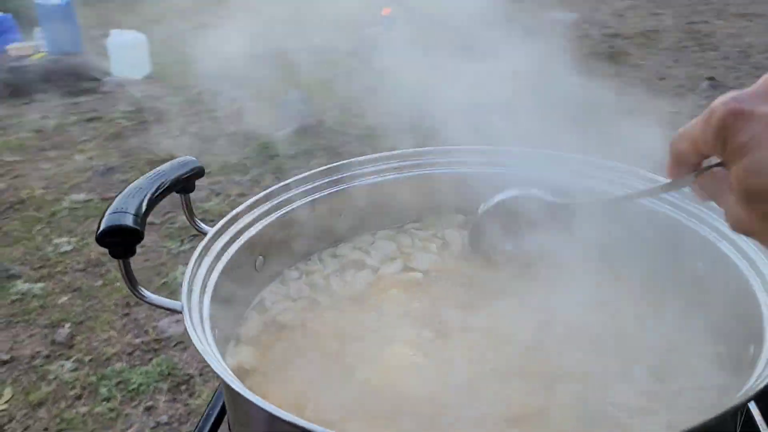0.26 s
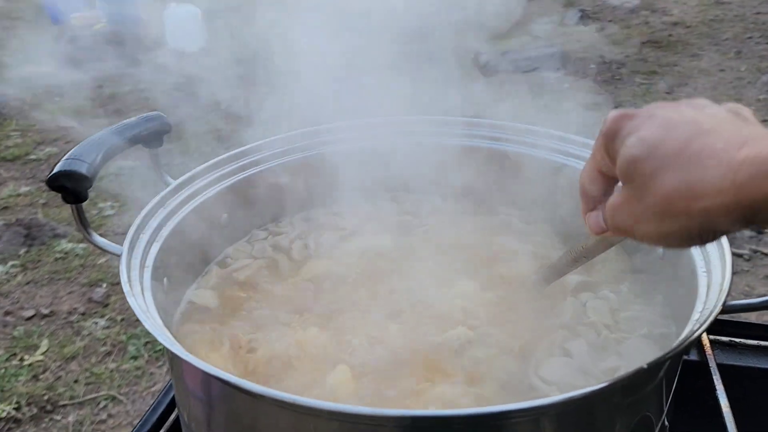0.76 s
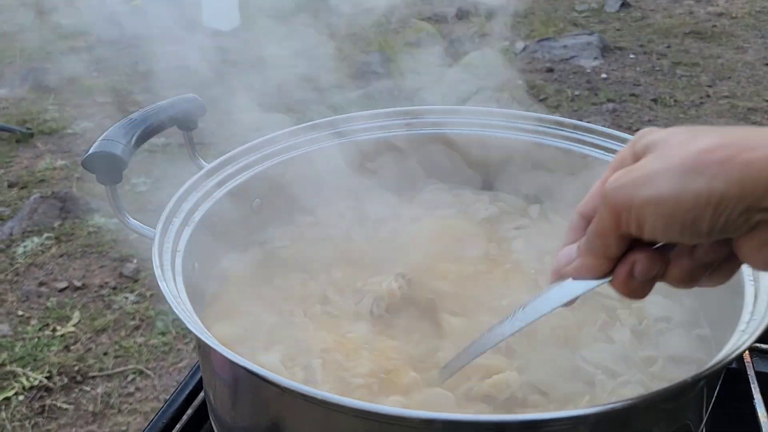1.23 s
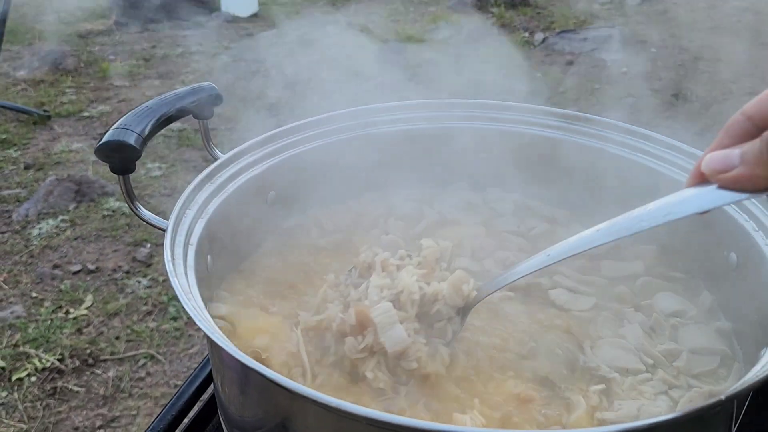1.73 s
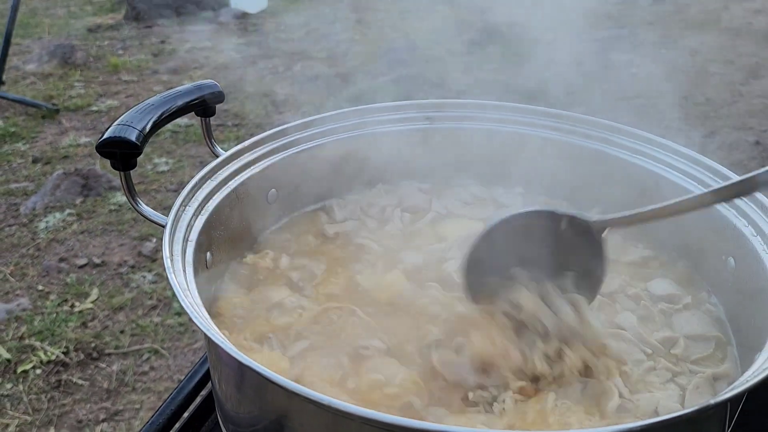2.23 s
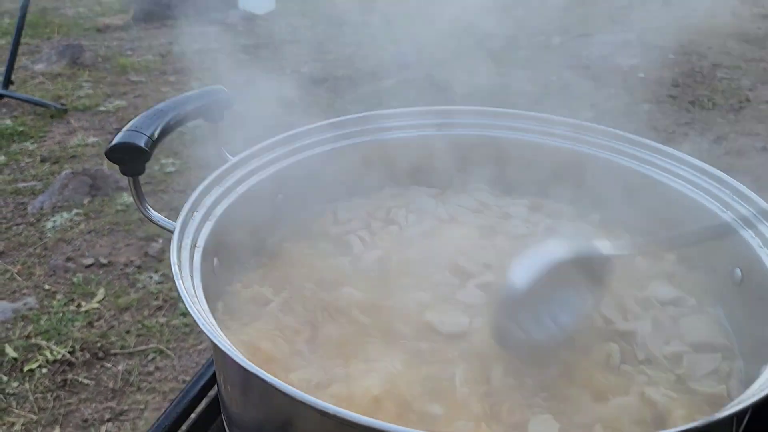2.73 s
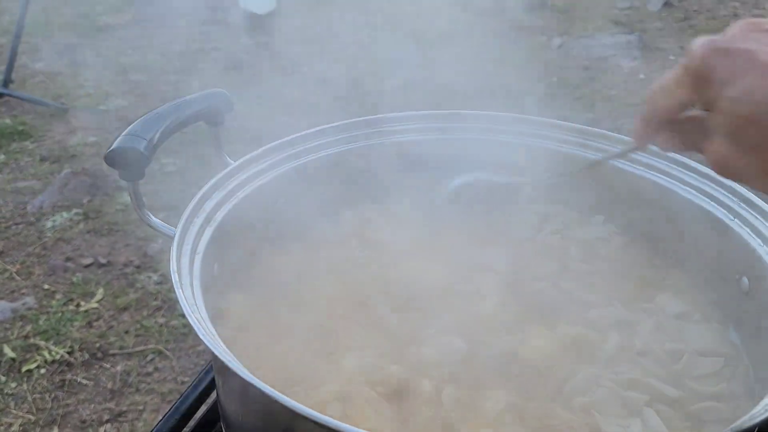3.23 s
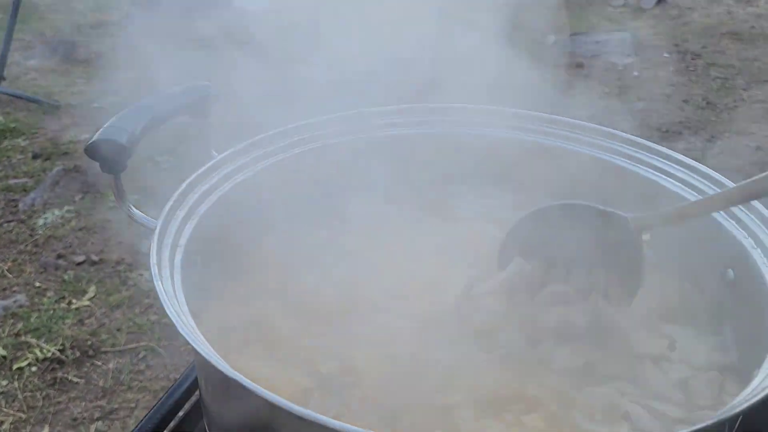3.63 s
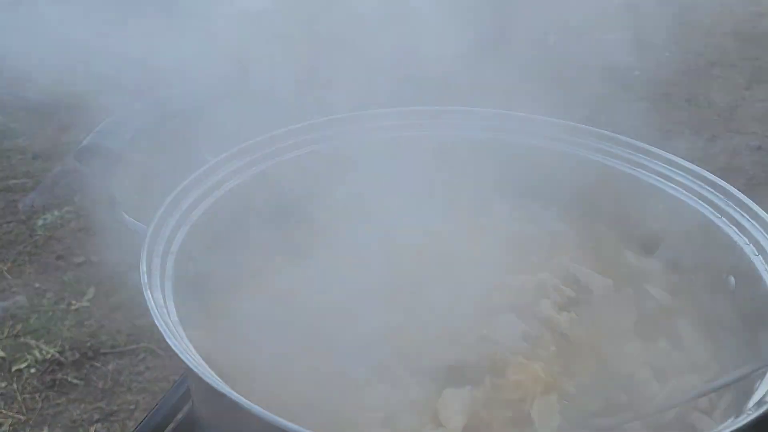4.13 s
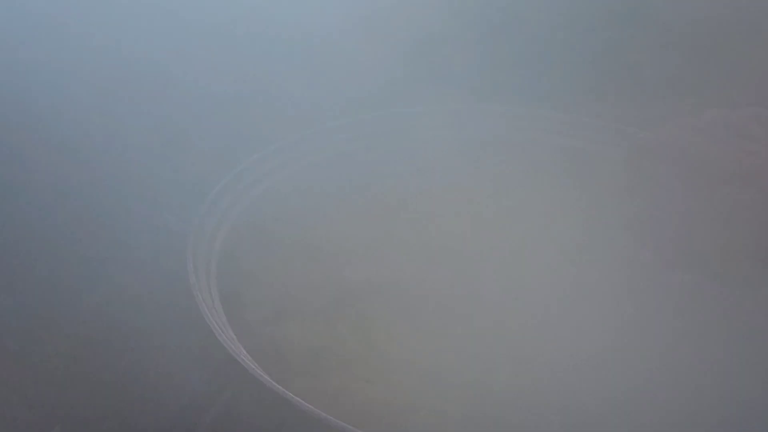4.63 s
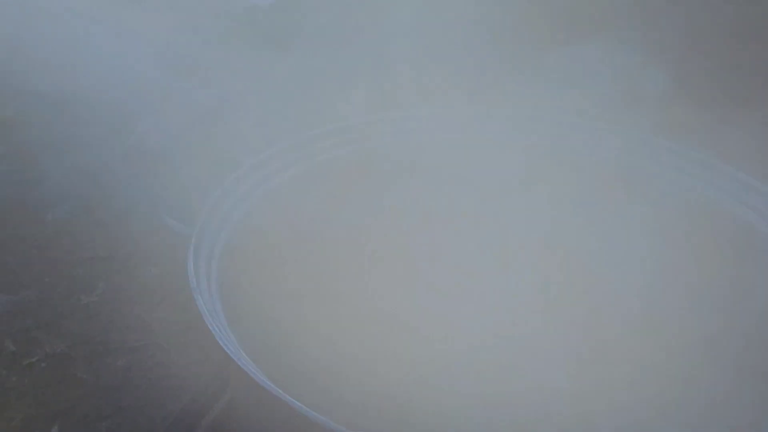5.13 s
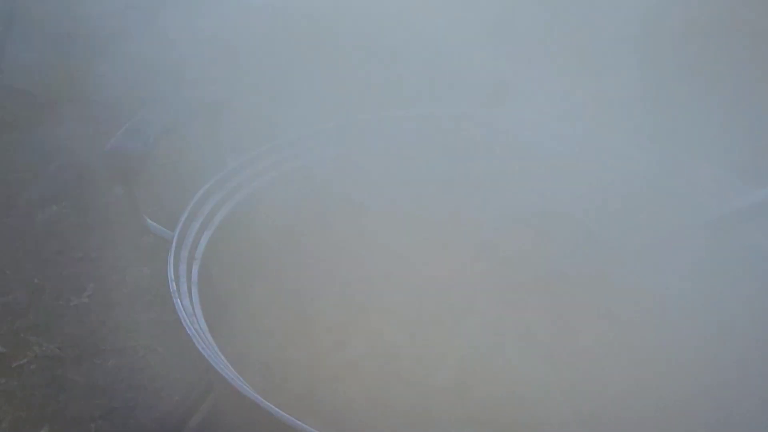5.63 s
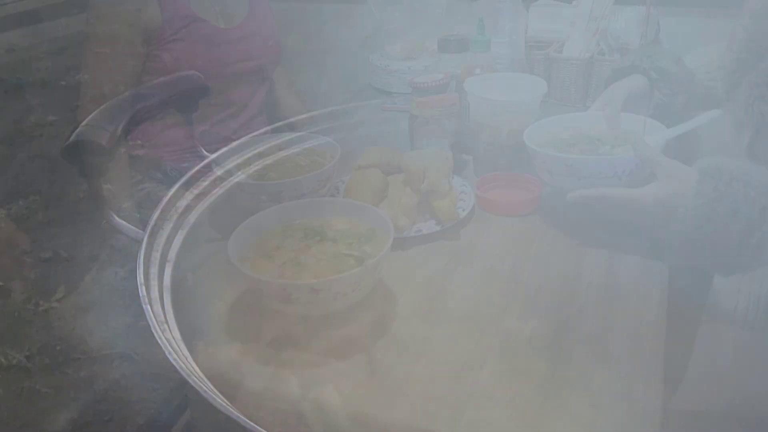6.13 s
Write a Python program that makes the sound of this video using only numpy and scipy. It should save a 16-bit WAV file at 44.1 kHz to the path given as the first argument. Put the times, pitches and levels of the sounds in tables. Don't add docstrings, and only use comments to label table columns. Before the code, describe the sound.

A continuous bass-heavy burner rumble dominates, pulsing irregularly beneath a metal pot at a campsite. Over it lie faint gas hiss, surging steam and fine liquid crackle. Short, dry metal ticks from a ladle come in sparse clusters, leaning right, the loudest about two thirds through, joined by dull watery plops. Droplets tick on hot metal. Near, dry, open-air stereo sound, easing a little in level at the close.

```python
import sys
import numpy as np
from scipy import signal
from scipy.fft import rfft, irfft, next_fast_len
from scipy.io import wavfile
from scipy.ndimage import uniform_filter1d

SR = 44100
rng = np.random.default_rng(int(sys.argv[2]) if len(sys.argv) > 2 else 0)


def level_to_linear(level):
    exponent = np.asarray(level, float) / 20
    return 10 ** exponent


def store_wav(level_fs):
    pcm = np.round(np.clip(np.atleast_2d(level_fs), -1, 1) * 32767)
    wavfile.write(sys.argv[1], SR, pcm.T.astype(np.int16))


N = 280467
LENGTH = next_fast_len(N)
FREQS = np.fft.rfftfreq(LENGTH, 1 / SR) + 1e-3
TIME = np.arange(N) / SR


def contour(points):
    hz, value = np.transpose(points)
    return np.interp(np.log(FREQS), np.log(hz), value)


def path(bumps):
    return level_to_linear(sum(db * np.exp(-(2 * (FREQS - hz) / width) ** 2) for hz, width, db in bumps))


def walk(rate):
    hold = max(int(SR / rate), 2)
    steps = np.repeat(rng.standard_normal(N // hold + 1), hold)
    return np.sqrt(2) * uniform_filter1d(uniform_filter1d(steps, hold), hold)[:N]


def swells(peak_s, size, length_s):
    t = TIME[::64]
    bells = (a * np.exp(-(2 * (t - c) / w) ** 2) for c, a, w in np.broadcast(peak_s, size, length_s))
    return np.interp(TIME, t, sum(bells))


def decay(t, t60_s):
    return np.exp(-np.log(1000) * t / t60_s)


def ring(x, hz, width_hz):
    return signal.lfilter(*signal.iirpeak(hz, hz / width_hz, fs=SR), x)


def add(out, start_s, sound, pan_db):
    i = int(start_s * SR)
    sides = level_to_linear(np.array([[pan_db], [-pan_db]]) / 2)
    out[:, i:i + sound.shape[-1]] += (sound * sides)[:, :N - i]


# pitch_hz, width_hz, level_db
LEFT_PATH = [(360, 50, -4), (510, 60, 2), (720, 130, 2), (860, 110, -2), (980, 120, 2), (1210, 110, -3),
             (1480, 320, 4), (1890, 100, -2), (2080, 250, 2), (2480, 200, -2), (10800, 1500, 2)]
RIGHT_PATH = [(367, 43, -4), (440, 110, 4.5), (549, 80, 6.5), (614, 78, -13), (739, 67, 5),
              (1220, 570, -5.5), (1427, 294, 11), (1945, 88, -4.5), (3080, 490, 5), (4150, 560, 2.5),
              (5500, 5360, 5), (7180, 1400, 5), (9230, 1500, 4), (11430, 1850, 6.5)]
# pitch_hz, share (0-1)
LIKENESS = [(60, 0.99), (300, 0.99), (540, 0.89), (630, 0.12), (740, 0.95), (1000, 0.08), (1200, 0.02),
            (1480, 0.84), (1900, 0.6), (2150, 0.36), (2600, 1), (3100, 0.57), (5000, 0.05), (8000, 0.01)]


def at_microphones(excite, spectrum, lag_s):
    common, left, right = (rfft(excite(), LENGTH) for _ in "clr")
    share = np.clip(contour(LIKENESS), 0, 1)
    lagged = common * np.exp(-2j * np.pi * FREQS * lag_s)
    left = np.sqrt(share) * lagged + np.sqrt(1 - share) * left
    right = np.sqrt(share) * common + np.sqrt(1 - share) * right
    arriving = np.array([left * path(LEFT_PATH), right * path(RIGHT_PATH)])
    return arriving * level_to_linear(contour(spectrum)) * np.sqrt(SR / 2)


def flickering(spectra, edges_hz, band_db):
    place = np.interp(np.log(FREQS), np.log(edges_hz), np.arange(len(edges_hz)))
    out = np.zeros((2, N))
    for k in range(len(edges_hz)):
        band = irfft(spectra * np.clip(1 - abs(place - k), 0, 1), LENGTH)[:, :N]
        out += band * level_to_linear(band_db(k))
    return out


# pitch_hz, level_db (per hertz)
ROAR_SPECTRUM = [(20, -78), (32, -68), (50, -55), (70, -51), (112, -58.5), (215, -54.5), (300, -57),
                 (420, -63.5), (600, -69.5), (900, -75.5), (1500, -76), (2200, -80), (3000, -96),
                 (4500, -108)]


def roar(roar_db, throat_db):
    spectra = at_microphones(lambda: rng.standard_normal(N), ROAR_SPECTRUM, lag_s=-0.000027)
    flutter_db = 0.6 * walk(15)
    throat_share = np.array([0.036, 0.0061, 0.26, 0.61, 0.83, 1.0])

    def band_db(k):
        return throat_share[k] * (throat_db + flutter_db) + 1.03 * walk(8)
    return level_to_linear(roar_db) * flickering(spectra, [60, 150, 400, 800, 1500, 3000], band_db)


# peak_s, level_db, pitch_hz, length_s
PUFFS = [(0.037, -24, 78.7, 0.12), (0.2, -32, 78.2, 0.095), (0.29, -39, 74.6, 0.036),
         (0.48, -31, 79.7, 0.057), (0.837, -26, 73.5, 0.1), (0.991, -24, 75.9, 0.032),
         (1.107, -31.5, 80.3, 0.08), (1.27, -20.5, 73.7, 0.14), (1.572, -34.5, 71.3, 0.14),
         (1.728, -31.5, 73.06, 0.05), (1.906, -29.5, 75.5, 0.081), (1.999, -30, 70.66, 0.051),
         (2.152, -32, 73.2, 0.11), (2.306, -30.5, 78.7, 0.2), (2.646, -29.5, 76.5, 0.16),
         (2.862, -34, 84.6, 0.066), (3.103, -28, 78.5, 0.042), (3.3, -28.5, 77, 0.21),
         (3.61, -25.5, 78.2, 0.17), (4.02, -28, 80.24, 0.16), (4.335, -30.5, 77.15, 0.22),
         (4.55, -35, 77.2, 0.034), (4.893, -31, 77.2, 0.36), (5.26, -37.5, 74.8, 0.18),
         (5.409, -28.5, 79.2, 0.041), (5.591, -26, 79, 0.028), (5.76, -31, 76.8, 0.24),
         (5.952, -32, 77.8, 0.049), (6.219, -36.5, 77.4, 0.044), (6.314, -34.5, 73.4, 0.063)]


def thrum():
    peak_s, level_db, pitch_hz, length_s = np.transpose(PUFFS)
    wobble_hz, puff_db = 6 * walk(22), 2.2 * walk(22)
    phase = 2 * np.pi * np.cumsum(np.interp(TIME, peak_s, pitch_hz) + wobble_hz) / SR
    level = level_to_linear(-44) + swells(peak_s, level_to_linear(level_db), length_s)
    tone = np.sqrt(2) * level * level_to_linear(puff_db) * np.sin(phase)
    return tone * level_to_linear(np.array([[.25], [-.25]]))


# pitch_hz, level_db (per hertz)
HISS_SPECTRUM = [(1200, -105), (2200, -90), (3000, -90.5), (4500, -91.5), (7000, -96.5), (10000, -100),
                 (14300, -102), (15200, -105), (16000, -106)]
# peak_s, lift_db
SPURTS = [(.01, 7.5), (.17, 1), (.23, 1), (.47, 9), (.505, 6), (.64, -1), (.73, 8), (1.1, 1), (2.17, 4),
          (2.36, 3), (2.48, 3), (2.745, 8), (3.03, 2), (3.21, -4), (3.66, 8), (3.78, 1), (3.92, 10),
          (4.04, 3), (4.15, 3), (4.35, 5), (4.57, 1), (5.09, 1), (5.17, 4), (5.421, 6), (5.71, 10.5),
          (5.93, 4), (6.06, 3)]


def hiss(level_db):
    peak_s, lift_db = np.transpose(SPURTS)
    spurt_db = swells(peak_s, lift_db, 0.035)
    surge = level_to_linear(0.6 * walk(25) + 1.1 * walk(80))
    size_db = np.minimum(7.4 * rng.exponential(size=N), 11)
    pops = (rng.random(N) < .004) * level_to_linear(size_db)
    burst = signal.lfilter([1], [1, -.96], pops)

    def excite():
        return surge * (0.77 + 0.39 * burst) * rng.standard_normal(N)

    spectra = at_microphones(excite, HISS_SPECTRUM, lag_s=-0.00013)
    held_back = np.array([0.0, 1, 0.19, 0.91, 0])
    spurt_share = 0.2

    def band_db(k):
        return held_back[k] * (spurt_share - 1) * spurt_db + 0.76 * walk(13)
    return level_to_linear(level_db + spurt_db) * flickering(spectra, [2500, 4000, 6540, 10100, 14000], band_db)


def bubbles(count=900):
    out = np.zeros((2, N))
    for when, size, cycles, strength, side in rng.random((count, 5)):
        hz = 800 * 2 ** (3.6 * size)
        turns = hz * TIME[:int((10 + 24 * cycles) * SR / hz)]
        shape = np.minimum(turns, 1) * np.exp(-turns / (7.6 + 4.3 * cycles))
        level_db = -50 - 3.8 * np.log2(hz / 1000) + np.minimum(-3.5 * np.log(strength), 9)
        pocket = shape * np.sin(2 * np.pi * turns * (1 + 0.0029 * turns))
        add(out, when * (N - 1) / SR, level_to_linear(level_db) * pocket, 8 * (side - .5) - 6.4 * size)
    return out


# pitch_hz, width_hz, level_db
METAL = [(1100, 700, 0), (1900, 700, -6), (2690, 220, -2), (3060, 200, 0), (3290, 220, 2), (3800, 300, 2),
         (4250, 260, 0), (4650, 280, 2), (5300, 300, 0), (5600, 260, 2), (6250, 300, 3), (6900, 400, -1),
         (7400, 400, -4)]


def metal_tick(hz, top_db, spread, t60_s):
    t = TIME[:1024]
    snap = 0.7 * rng.standard_normal((2, 1024)) * decay(t, max(t60_s, .002))
    snap[:, 0] = 9.
    blow = ring(snap, hz, 1.3 * spread * hz)
    body = np.zeros((2, 1024))
    for mode_hz, width_hz, mode_db in METAL:
        octaves = np.log2(mode_hz / hz)
        body += level_to_linear(mode_db - 6 * (octaves / spread) ** 2) * ring(blow, mode_hz, width_hz)
    body = body * decay(t, 4 * t60_s)
    body = signal.sosfilt(signal.butter(8, 7300, fs=SR, output="sos"), body)
    top = ring(ring(snap, 10700, 2800), 10700, 2800)
    return body / abs(body[1]).max() + level_to_linear(top_db + 13.5) * top / abs(top[1]).max()


# start_s, level_db (peak), pitch_hz, top_db
SPATTER = [(0.168, -41, 6130, -14), (0.2419, -51, 4000, -18), (0.5144, -40, 5220, -23),
           (0.631, -52, 4200, -5), (1.071, -40, 5970, -25), (1.9989, -44, 4640, -22),
           (2.1593, -47, 3930, -10), (3.1905, -44, 6355, -25), (3.205, -40, 7000, -23),
           (3.2282, -43, 4230, -24), (3.8942, -45, 4200, -14), (3.922, -38, 5100, -11),
           (3.9318, -49, 4570, -14), (4.2749, -41.5, 6500, -23), (4.6899, -43, 6250, -20),
           (4.7438, -47, 6540, -22), (4.8556, -48, 5300, -21), (5.7076, -44, 7240, -15),
           (5.874, -42, 3800, -17), (5.9037, -41, 5350, -20)]


def spatter():
    out = np.zeros((2, N))
    for start_s, level_db, hz, top_db in SPATTER:
        tick = metal_tick(hz, top_db, spread=0.23, t60_s=0.024)
        add(out, start_s, level_to_linear(level_db) * tick, -6)
    return out


# start_s, level_db (peak), pitch_hz, pan_db (left minus right), t60_s
PLOPS = [(.243, -33, 1150, 3, .02), (.469, -33, 1300, 0, .015), (.934, -35, 1640, 1, .04),
         (.939, -29, 1650, 1, .03), (3.0548, -26, 920, 2, .025), (3.0555, -32, 1600, 2, .02),
         (3.0605, -29, 780, 2, .03), (3.082, -31, 1470, 0, .035), (3.2545, -29, 1500, -4, .01),
         (3.255, -29, 2200, -6, .009), (3.577, -32, 950, 2, .04), (4.483, -25, 720, 0, .018),
         (4.5444, -17, 950, 1, .009), (4.5618, -30, 2000, -6, .009), (4.562, -29, 1150, -3, .012),
         (4.567, -33, 1600, -3, .02), (4.698, -34, 1540, -3, .03), (5.59, -36, 1480, 0, .06),
         (5.614, -37, 1450, 0, .03), (5.626, -33, 820, 2, .04), (5.646, -32, 900, 2, .025),
         (5.688, -35, 1420, 0, .04), (5.717, -37, 1500, 0, .04), (5.727, -31, 620, 0, .03),
         (5.763, -27, 800, -3, .04), (5.7628, -30, 1420, -3, .018), (5.7632, -33, 1100, -3, .015),
         (5.774, -36, 1420, 0, .05)]


def plops():
    out, t = np.zeros((2, N)), TIME[:4096]
    for start_s, level_db, hz, pan_db, t60_s in PLOPS:
        fade = decay(t, t60_s)
        bubble = np.sin(2 * np.pi * hz * t * (1 + 2.5 * t)) * fade
        overtone = 0.3 * (hz < 1300) * np.sin(2 * np.pi * 1.7 * hz * t) * fade ** 2
        grit = rng.standard_normal(4096) * fade ** 2
        splash = ring(ring(grit, 1.1 * hz, 600), 1.1 * hz, 600)
        onset = np.minimum(t * hz / 1.5, 1)
        add(out, start_s, level_to_linear(level_db - 2) * onset * (bubble + overtone + 1.6 * splash), pan_db)
    return out


# start_s, level_db (peak), pitch_hz, spread_octaves, t60_s
LADLE = [(.4565, -44, 4000, .8, 0.0052), (0.4672, -27.5, 6400, 0.2, 0.0071), (.4676, -39, 1700, .5, .004),
         (.4672, -34.5, 3020, 0.1, .007), (0.4683, -33, 4800, 0.2, .006), (.4965, -43, 6000, .4, .006),
         (.503, -41, 5400, .4, .008), (.5105, -46, 6210, .2, .005), (.525, -43, 6300, .3, .006),
         (.4715, -46, 5500, .6, .005), (.479, -41, 5800, .4, .012), (2.7872, -26, 5660, 0.57, 0.01),
         (3.2495, -44, 6285, .25, .006), (3.253, -29, 5500, 0.44, .004), (3.2547, -29, 3350, 0.2, .004),
         (3.2543, -35, 2000, .3, .005), (3.2553, -25, 5400, 0.61, .004), (3.2563, -33, 3283, 0.22, .005),
         (3.258, -36, 3253, 0.15, .006), (4.5434, -43, 3200, 0.45, .005), (4.549, -41, 4800, .3, 0.0051),
         (4.5551, -41, 6000, 0.33, 0.0038), (4.5551, -28.5, 3200, 0.35, .004), (4.557, -33, 3800, .8, .004),
         (4.562, -21, 4400, 1.2, .003), (4.5632, -14, 5210, 0.63, 0.003), (4.5647, -37, 2700, 0.09, 0.0078),
         (4.5656, -31, 5000, .8, .005), (4.568, -29, 4600, .4, .005), (4.5734, -38, 5600, 0.5, .006),
         (4.583, -49, 4600, .3, .006)]
# time_s, pan_db (left minus right)
LADLE_PAN = [
    (.5, -5),
    (2.8, -6),
    (3.2, -10),
    (4.565, -10.5),
    (4.575, -6),
]


def ladle():
    out = np.zeros((2, N))
    for start_s, level_db, hz, spread, t60_s in LADLE:
        pan_db = np.interp(start_s, *np.transpose(LADLE_PAN))
        tick = metal_tick(hz, -np.inf, spread, t60_s)
        add(out, start_s, level_to_linear(level_db) * tick, pan_db)
    return out


# start_s, level_db (peak), pitch_hz (centre), width_hz
SPARKS = [(.4565, -48, 8600, 1200), (.4674, -42, 13500, 8000), (.4676, -46, 9600, 2000),
          (.4698, -47, 11600, 2000), (.4725, -50, 13800, 1500), (3.2052, -42, 12500, 8000),
          (3.922, -49, 12500, 6000), (3.2558, -41, 11400, 1600), (3.2556, -46, 8300, 1500),
          (4.5558, -51, 11300, 2000), (4.5642, -33, 11700, 1600), (4.5638, -41, 15200, 3500),
          (4.564, -41, 8700, 1800)]


def sparks():
    out, t = np.zeros((2, N)), TIME[:1024]
    for start_s, level_db, hz, width_hz in SPARKS:
        grit = rng.standard_normal((2, 1024)) * decay(t, .004)
        spark = ring(ring(grit, hz, width_hz), hz, width_hz)
        add(out, start_s, level_to_linear(level_db) * spark / abs(spark[1]).max(), -4)
    return out


# time_s, level_db
HEAT = [(0, .5), (.5, 0.5), (1, 1.5), (1.4, -2), (1.65, -1), (2.1, -0.5), (2.6, 0), (3.1, 1), (3.6, 1.5),
        (3.9, -0.5), (4.4, -1), (5, -0.5), (5.35, -1), (5.8, -2)]


def scene():
    heat_db = np.interp(TIME, *np.transpose(HEAT))
    fade_db = np.clip(-11 * (TIME - 5.88), -3, 0)
    burner = roar(1.1 + 0.17 * heat_db, -4 + heat_db) + hiss(-1 + 0.49 * heat_db)
    boil = bubbles() * level_to_linear(-0.5 + heat_db)
    return thrum() + level_to_linear(fade_db) * (burner + boil) + spatter() + plops() + ladle() + sparks()


def roll_off(x):
    return signal.sosfilt(signal.butter(12, 16280, fs=SR, output="sos"), x)


EDGE_HZ = [14750, 15150, 15500, 15830]


def record(dry):
    spectra = rfft(dry, LENGTH)

    def band(low_hz, high_hz):
        return irfft(spectra * ((FREQS >= low_hz) & (FREQS < high_hz)), LENGTH)[:, :N]

    mix = band(0, EDGE_HZ[0])
    chance = walk(25)
    for level_db, bar, low_hz, high_hz in zip((0, -7, -9), (-1.1, .9, 1.7), EDGE_HZ, EDGE_HZ[1:]):
        opening = uniform_filter1d(1. * (chance > bar), size=512)
        mix = mix + level_to_linear(level_db) * opening * band(low_hz, high_hz)
    above = band(EDGE_HZ[1], SR / 2)
    loudness = uniform_filter1d(abs(above[1]), size=128)
    hard = uniform_filter1d(1. * (loudness > 2.3 * np.std(above[1])), size=128)
    mix = mix + hard * above
    return roll_off(mix)


dry = scene()
out = record(dry)
store_wav(out)
```